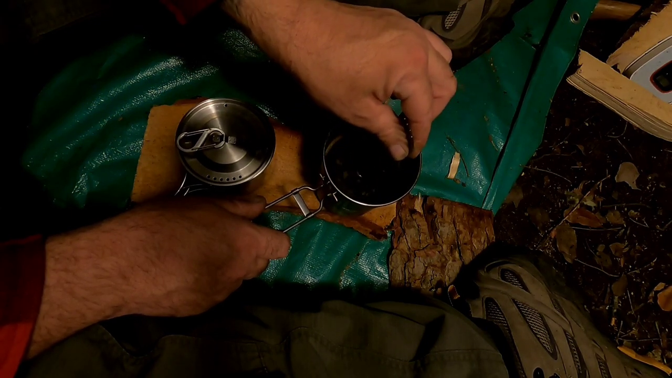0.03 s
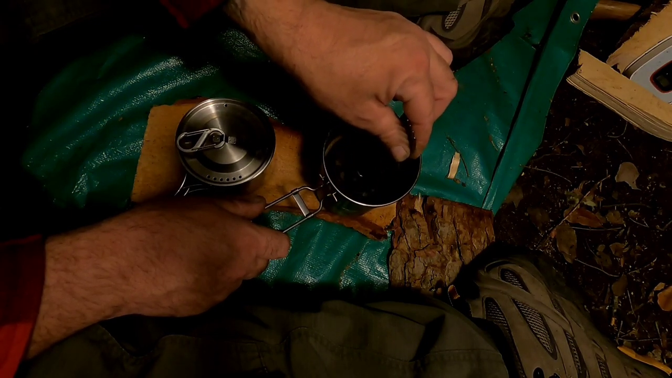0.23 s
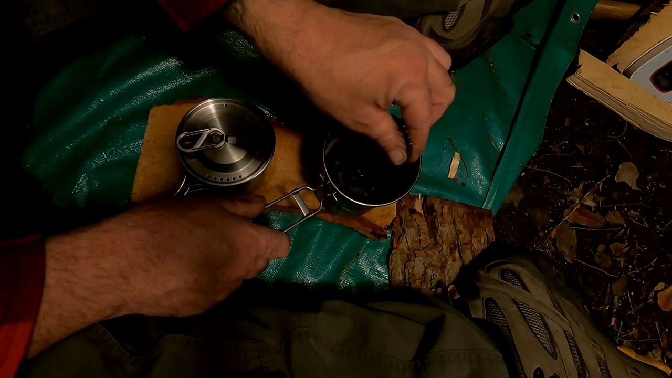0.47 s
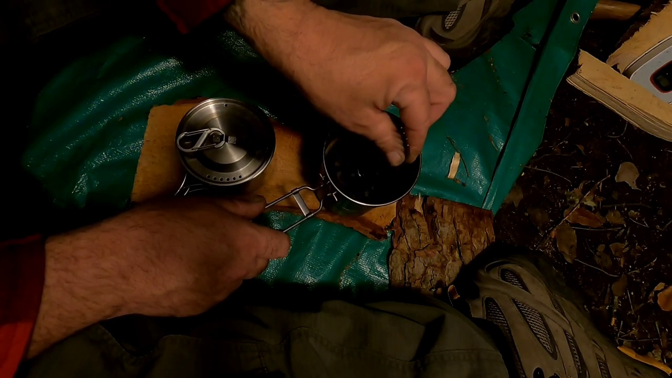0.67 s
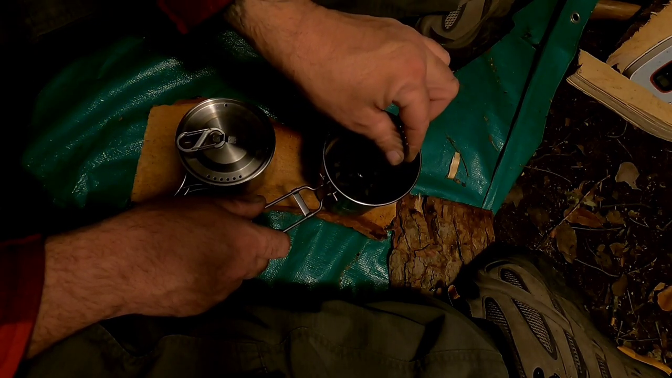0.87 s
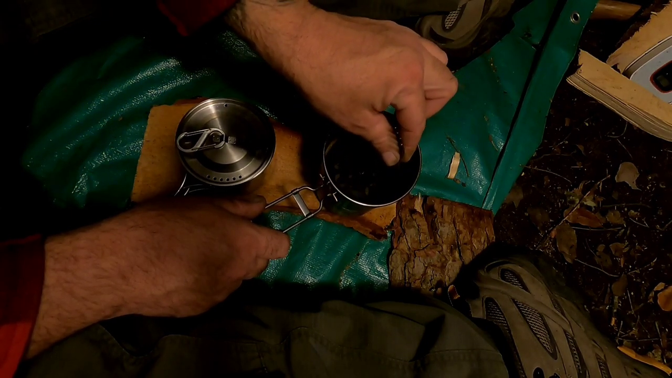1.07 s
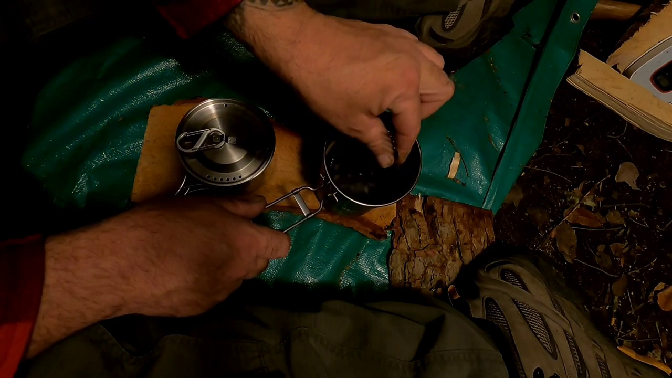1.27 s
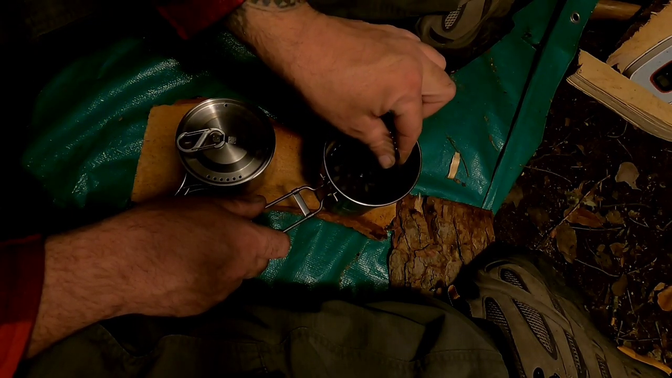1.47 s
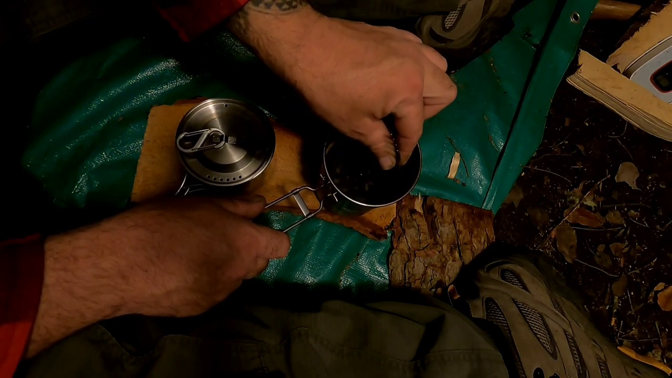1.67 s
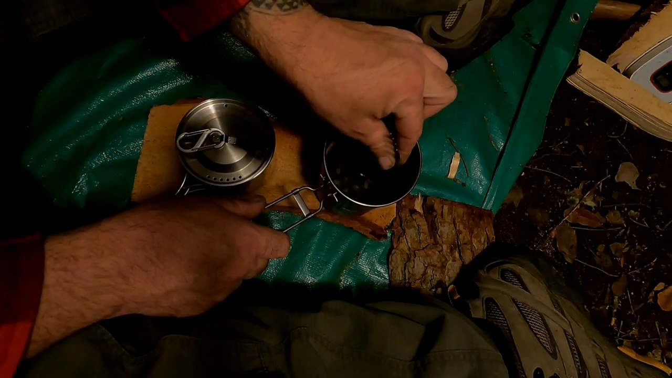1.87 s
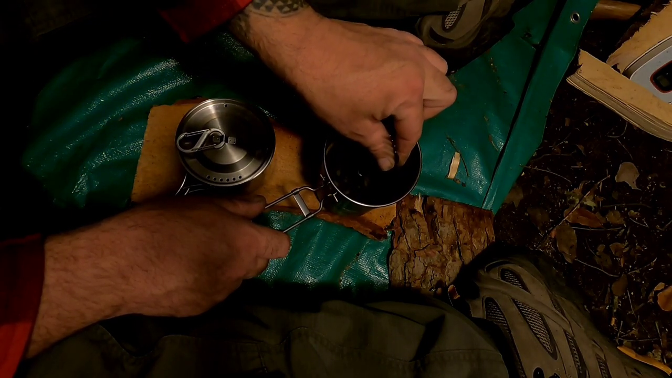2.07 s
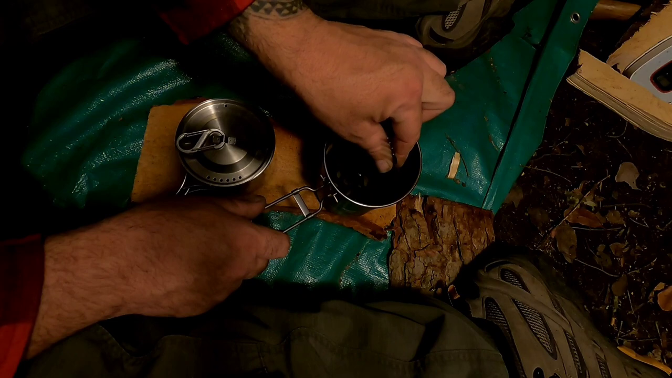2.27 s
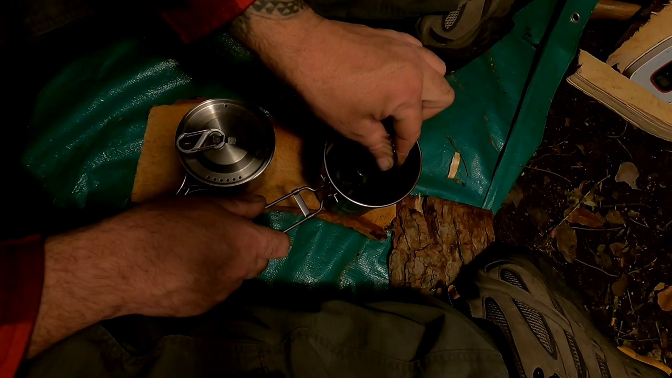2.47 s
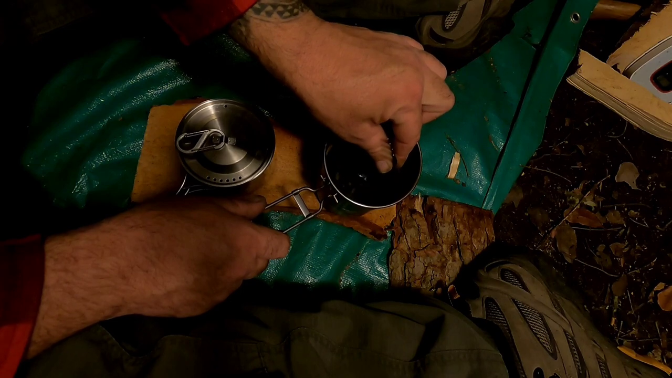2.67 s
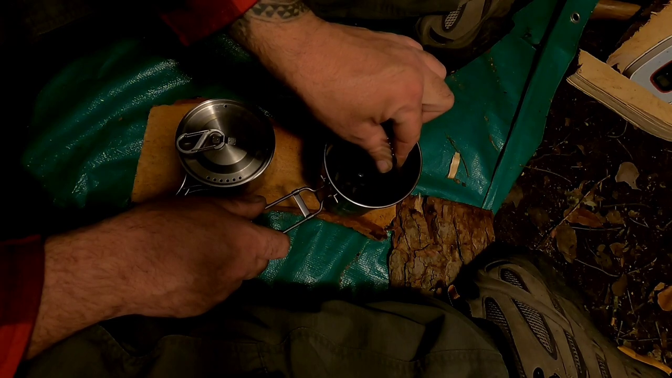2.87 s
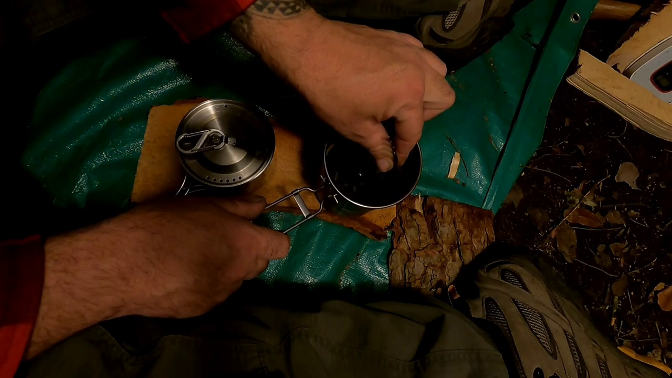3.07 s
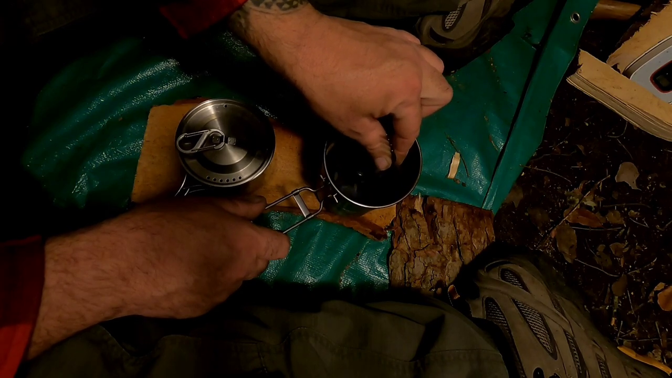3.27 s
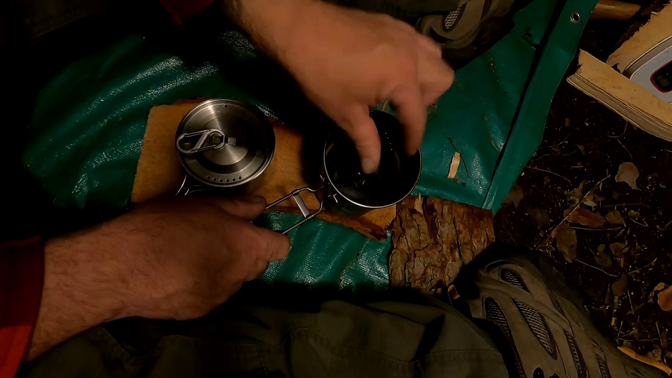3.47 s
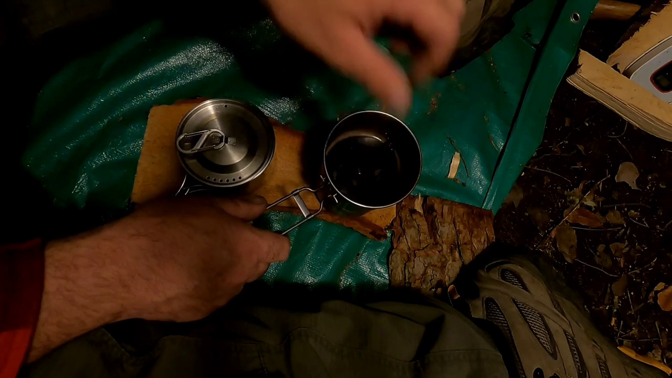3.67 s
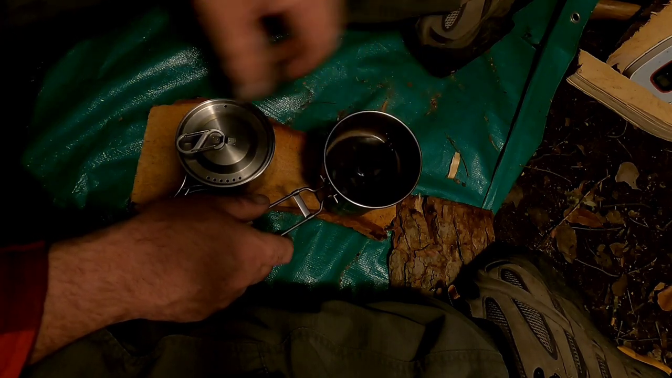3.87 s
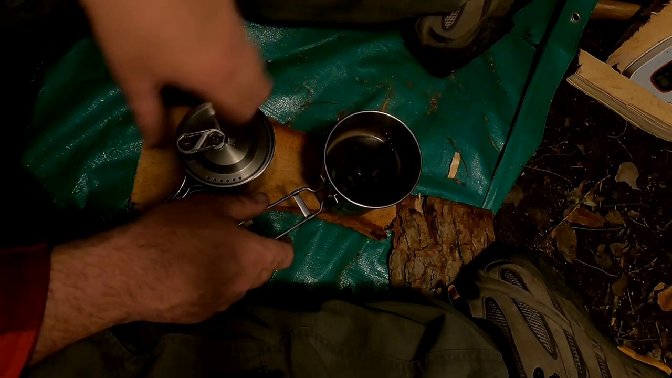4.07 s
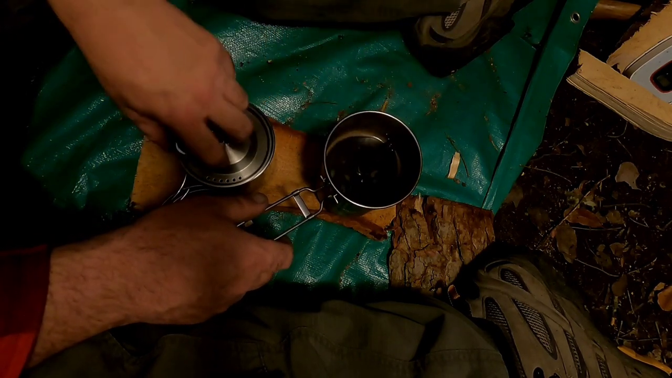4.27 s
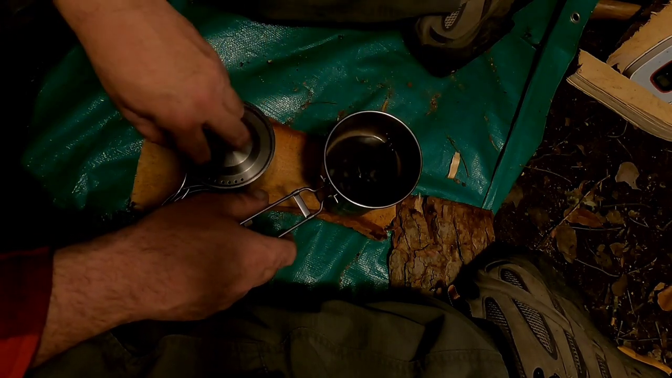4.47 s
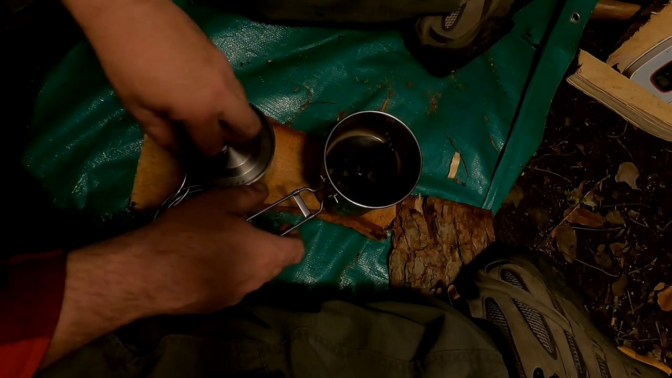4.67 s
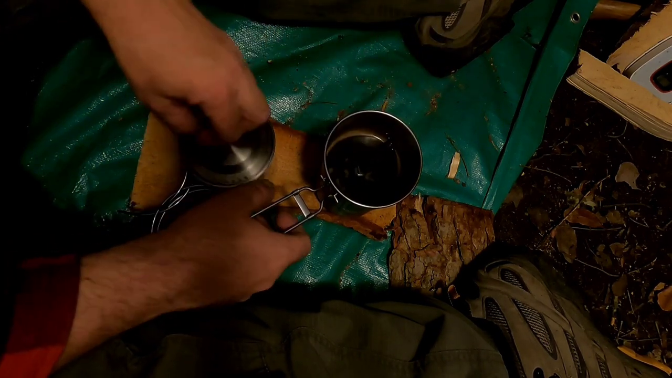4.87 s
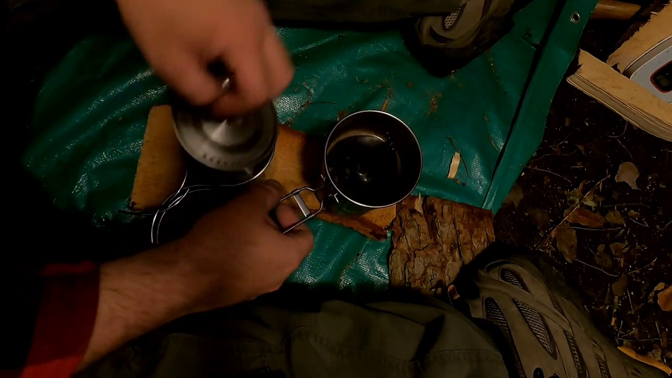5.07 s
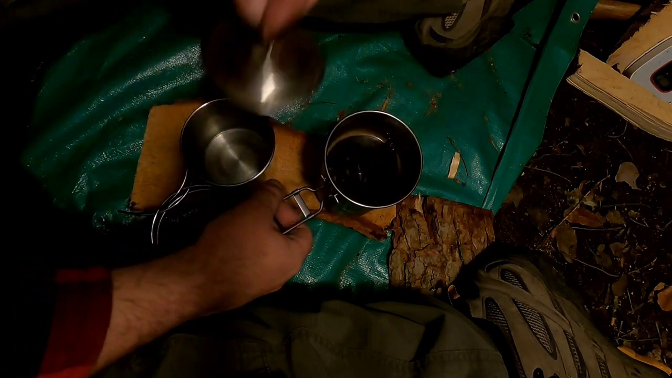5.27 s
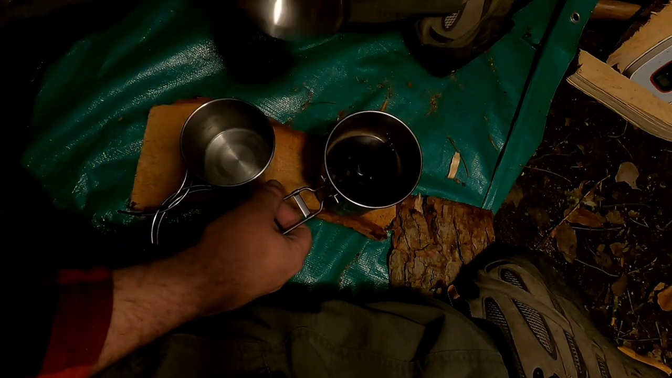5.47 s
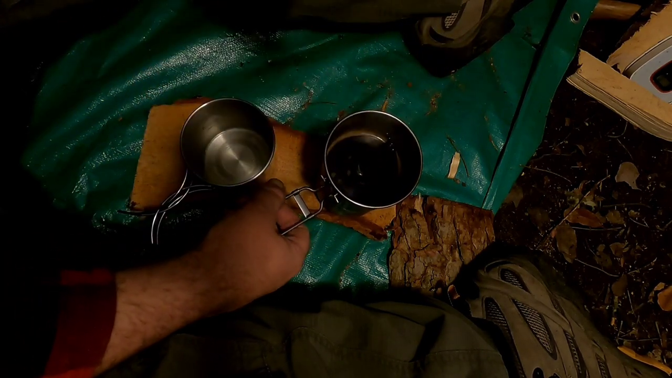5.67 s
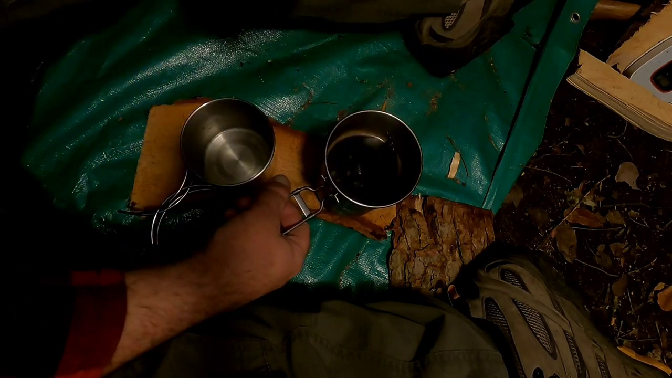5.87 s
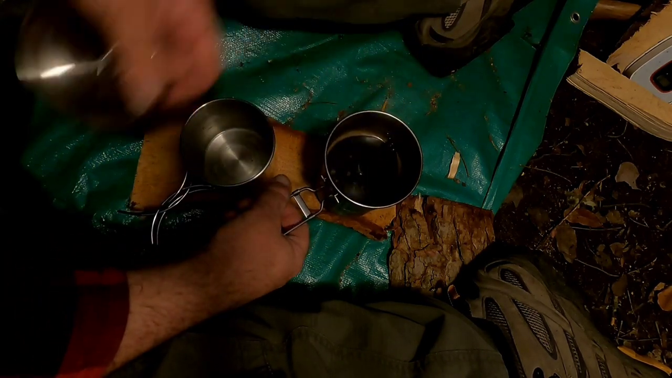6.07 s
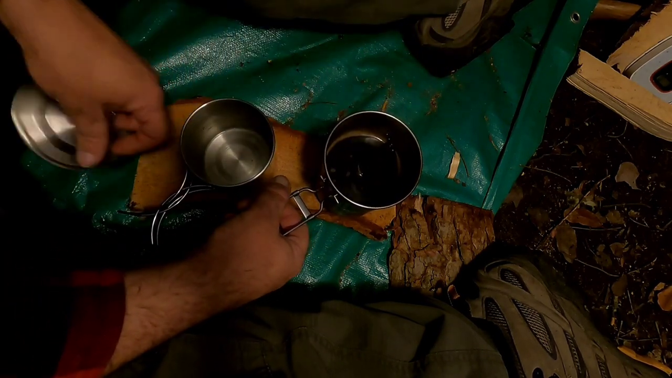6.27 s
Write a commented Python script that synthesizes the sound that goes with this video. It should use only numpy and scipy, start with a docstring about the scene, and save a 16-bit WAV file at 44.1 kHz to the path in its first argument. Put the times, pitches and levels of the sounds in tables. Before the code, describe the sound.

Close up in a tent, fingers squeak and crackle quietly before a thin steel lid grinds loose from its cup and its wire handle jingles away.

```python
"""Small squeaks and crackles of fingers squeezing something over a mug, in a tent with a low rumble; a sleeve swishes.
Then a steel lid is gripped and dragged off its cup, clashing and scraping; its wire handle rattles as it is carried away.
Steel is struck banks of damped modes with a wash of noise; squeaks are bent tones; knocks are decaying sines.
Air, rumble, cloth and crackles are coloured noise, and short noise echoes give the tent."""
import sys
import numpy as np
from scipy import signal
from scipy.fft import rfft, irfft, next_fast_len
from scipy.io import wavfile

SR = 44100
rng = np.random.default_rng(int(sys.argv[2]) if len(sys.argv) > 2 else 0)


def materialize(psi):
    """Save the field psi as 16-bit PCM at rate SR to the path in sys.argv[1].

    A 1-D psi becomes a single channel; in a 2-D psi each row is a channel.
    """
    bounded = np.clip(np.atleast_2d(psi).T, -1, 1)
    quanta = np.round(bounded * 32767).astype(np.int16)
    wavfile.write(sys.argv[1], SR, quanta)


N = 279153
TIME = np.arange(N) / SR  # seconds into the scene
AGE = np.arange(SR // 2) / SR  # seconds since a contact

# fingertip strokes, each a run of squeaky slips:
# start_s, length_s, level_db, pitch_hz (near the top of the bend), slips (count, rounded; also sets the pace)
SKIN_STROKES = [(0.086, 0.07, -57, 1008, 2.7), (.165, .026, -52.5, 986, 1), (.329, 0.14, -52.5, 992, 3.9),
                (0.585, 0.093, -54.5, 987, 3.7), (0.836, 0.043, -58, 1065, 2),
                (0.874, 0.022, -50, 1303, 1.1), (.901, .118, -53, 999, 2.1), (1, 0.083, -50.5, 1302, 2),
                (1.081, 0.1, -51.5, 973, 3.4), (1.199, 0.025, -57.5, 858, 1),
                (1.643, 0.024, -53, 1370, 1.1), (1.816, 0.016, -59.5, 1373, 0.98)]
# ringing modes of the cup with the lid in it: pitch_hz, level_db (relative), t60_s
CUP_MODES = [(650, -11, .035), (1589, 1, .07), (1789, -4, .08), (2168, 2, .13), (2237, 0, .14),
             (2293, -7, .14), (2440, -7, .16), (2750, -10, .06), (3390, -12, .13), (3590, -12, .12),
             (4161, -12, .26), (4436, -6, .18), (4527, -9, .22), (4873, -10, .35), (4990, -7, .12),
             (5425, -6, .12), (5557, -5, .15), (5745, -5, .2), (6190, -8, .13), (6660, -10, .22),
             (6893, -1, .13), (7007, -5, .15), (7460, -8, .12), (7820, -7, .12), (8650, -14, .15),
             (9030, -13, .13), (9950, -16, .13), (11022, -15, .14), (12000, -18, .1)]
# colour of the cup's crowd of weak, quickly damped modes: frequency_hz, density_db (per Hz)
CUP_WASH = [(120, -30), (260, -8), (420, -2.5), (650, -5.5), (950, 0), (1280, -11), (1550, 5.5),
            (2400, -5.5), (3200, -2.5), (5200, 0), (7700, -1), (9000, -11), (12500, -13.5), (15000, -39.5)]


def from_db(db):
    """Amplitude factor of a level in dB."""
    return 10 ** (np.asarray(db) / 20)


def rms_one(x):
    """Scale to rms 1."""
    return x / np.sqrt(np.mean(x ** 2))


def attack_one(x):
    """Scale to rms 1 over the first hundredth of a second."""
    return x / np.sqrt(np.mean(x[:SR // 100] ** 2))


def curve(rows):
    """Straight lines through (s, value) points over the whole scene."""
    return np.interp(TIME, *np.transpose(rows))


def decay(t60):
    """Exponential fade that falls 60 dB in t60 seconds."""
    return np.exp(-np.log(1000) * AGE / t60)


def onset(swell_s):
    """Smooth rise from silence with the given time constant."""
    return 1 - np.exp(-AGE / swell_s)


def add(track, s, sound):
    """Mix a sound into a track from time s on."""
    start = round(s * SR)
    track[start:start + len(sound)] += sound[:N - start]


def noise(spectrum, size):
    """Noise of the given colour, rms 1."""
    hz, db = np.transpose(spectrum)
    padded = next_fast_len(size)
    bins = np.maximum(np.fft.rfftfreq(padded, 1 / SR), 1)
    gain = from_db(np.interp(np.log(bins), np.log(hz), db))
    return rms_one(irfft(rfft(rng.standard_normal(padded)) * gain, padded)[:size])


def wide_noise(spectrum, side_db):
    """Stereo noise, mostly common to both sides, and almost wholly so in the deep bass."""
    high_pass = signal.butter(2, 120, "high", fs=SR, output="sos")
    side = signal.sosfilt(high_pass, noise(spectrum, N))
    return noise(spectrum, N) + from_db(side_db) * side * np.array([[1], [-1]])


def drift(per_s):
    """Slow random wandering, with knots of spread 1 joined by straight lines."""
    knots = rng.standard_normal(N // 20)
    return np.interp(TIME * per_s, np.arange(len(knots)), knots)


def thumps(rows, swell_s):
    """Each push sets one mode swinging: (s, dB, Hz, t60 s)."""
    out = np.zeros(N)
    for s, db, hz, t60 in rows:
        shape = decay(t60) * onset(swell_s) ** 2
        shape /= shape.max()
        add(out, s, from_db(db) * shape * np.sin(2 * np.pi * hz * AGE))
    return out


def voiced_by_contact(sound, clang_db, treble_db):
    """A hard contact favours the treble, a soft one the low modes."""
    split_hz = 2800
    low_pass = signal.butter(4, split_hz, "low", fs=SR, output="sos")
    high_pass = signal.butter(4, split_hz, "high", fs=SR, output="sos")
    clang = attack_one(signal.sosfilt(low_pass, sound))
    treble = attack_one(signal.sosfilt(high_pass, sound))
    return from_db(clang_db) * clang + from_db(treble_db) * treble


def tent(x, near_db, tail_db, tail_t60):
    """Board, hands and fabric throw back early echoes, different at each ear, then a faint tail."""
    colour = [(100, -7.0), (500, -4.0), (6000, -3.0), (15000, -2.0)]  # (Hz, dB per Hz)
    sides = []
    for _ in range(2):
        near = noise(colour, len(AGE)) * decay(0.029) * (AGE > .0004)
        tail = noise(colour, len(AGE)) * decay(tail_t60) * (AGE > .008)
        near /= np.linalg.norm(near)
        tail /= np.linalg.norm(tail)
        echoes = from_db(near_db) * near + from_db(tail_db) * tail
        sides.append(x + signal.fftconvolve(x, echoes)[:N])
    return np.array(sides)


def still_air():
    """Steady coloured noise of the air."""
    # colour of the air: frequency_hz, density_db (per Hz)
    air_colour = [(15, -39), (25, -20), (59, -1.5), (103, -15.5), (181, 0), (237, -3.5), (354, -12),
                  (673, -20.5), (856, -23.5), (1030, -15.5), (1460, -12.5), (3930, -41), (7280, -44),
                  (12100, -39), (15000, -48)]
    return from_db(-64.5) * wide_noise(air_colour, side_db=-4)


def low_rumble():
    """Low noise whose level wanders unevenly around a slow curve."""
    # colour of the rumble: frequency_hz, density_db (per Hz)
    rumble_colour = [(20, -12.5), (55, 5), (105, -7.5), (170, 4), (250, -2.5), (400, -17.5), (700, -57)]
    # central level of the rumble: time_s, level_db
    rumble_level = [(0, -63.5), (.95, -64), (1.7, -59.5), (4.3, -61.5), (4.5, -62.5), (6.33, -77)]
    level_db = curve(rumble_level) + 2.3 * drift(8.3)
    return from_db(level_db) * wide_noise(rumble_colour, side_db=-13.5)


def sliding_strength():
    """Strength of the friction hiss: the sleeve, plus skin for the length of each stroke."""
    # sleeve sliding as the arm swings across and carries the lid off: time_s, level_db
    sleeve_level = [(3.5, -71.5), (3.62, -65.5), (3.75, -53.5), (3.9, -61), (4.1, -66.5), (5.15, -56.5),
                    (5.45, -66), (5.95, -58.5), (6.33, -62.5)]
    skin_hiss_db, skin_fade_s = -20.5, 0.0055  # hiss is relative to the squeaks
    gain = from_db(curve(sleeve_level))
    for start, length, db, _, _ in SKIN_STROKES:
        outside_s = np.maximum(np.abs(TIME - start - length / 2) - length / 2, 0)
        fade = np.maximum(1 - outside_s / skin_fade_s, 0)
        gain = gain + from_db(db + skin_hiss_db) * fade
    return gain


def sliding_cloth_and_skin():
    """Friction makes a fluttering hiss as strong as the sliding."""
    # colour of the rustle: frequency_hz, density_db (per Hz)
    rustle_colour = [(240, -34), (400, 0.5), (576, -11.5), (816, -10), (1290, 2), (2830, 0), (3450, -5.5),
                     (6320, -1.5), (12300, -20), (15000, -32)]
    flutter = from_db(1.22 * drift(90))
    return sliding_strength() * flutter * wide_noise(rustle_colour, side_db=-8.5)


def slips_of_skin():
    """A fingertip sticks and slips at a nearly even pace through each stroke: (s, dB, Hz)."""
    scatter_db, pitch_spread = 1.5, 0.0433  # from one slip to the next
    for start, length, db, hz, slips in SKIN_STROKES:
        pace_s = length / max(slips, 1)
        for k in range(round(slips)):
            late, force, bend = rng.standard_normal(3)
            slip_s = start + pace_s * (k + 0.0706 * late)
            yield slip_s, db + scatter_db * force, hz * (1 + pitch_spread * bend)


def squeaks(length_s, arch, second_db, rub_db):
    """Each slip of a fingertip is a brief rough tone that rises and falls in pitch."""
    # colour of the rub: (Hz, dB per Hz)
    rub_colour = [(400, -11.5), (900, 2.5), (1400, -3.0), (2000, -4), (2700, -8.5), (3500, -40), (12000, -41)]
    out = np.zeros(N)
    for s, db, hz in slips_of_skin():
        stretch, skew = np.exp(0.203 * rng.standard_normal(2))  # slips vary in length and bend
        progress = np.minimum(AGE / (length_s * stretch), 1)
        hump = np.sin(np.pi * progress ** skew)
        phase = 2 * np.pi * np.cumsum(hz * (1 + arch * (hump - .88))) / SR
        tone = np.sin(phase) + from_db(second_db) * np.sin(2 * phase)
        rub = noise(rub_colour, len(AGE)) * decay(0.17) * onset(0.0034)
        add(out, s, from_db(db) * (tone * np.abs(hump) ** 1.6 + from_db(rub_db) * rub))
    return out


def crackles(grain_db):
    """Crackles and ticks of handling are short bursts of noise with uneven grains."""
    # bursts: start_s, low_db (below 2.8 kHz), treble_db, t60_s
    bursts = [(.275, -53, -66.5, 0.33), (.497, -57.5, -57, 0.19), (1.293, -77, -66.5, 0.19),
              (1.561, -79, -67.5, .2), (1.653, -65, -61, 0.054), (1.907, -98, -64, 0.054),
              (2.055, -77, -65, .076), (2.148, -79, -64, 0.19), (2.228, -58.5, -72, 0.19),
              (2.379, -59, -55, 0.34), (2.549, -69.5, -64, 0.11), (2.778, -90, -65, 0.016),
              (3.271, -56.5, -66, 0.34), (3.364, -56, -51.5, .17), (5.695, -47, -55, 0.021),
              (6.019, -75, -56, 0.061)]
    # colour of the bursts: frequency_hz, density_db (per Hz)
    crackle_colour = [(200, -5), (600, -9.5), (1400, 3.5), (2300, -2), (4000, -3), (7000, 1.5), (10000, -7),
                      (12500, -20), (15000, -20)]
    out = np.zeros(N)
    knots = AGE[::64]
    for s, low_db, treble_db, t60 in bursts:
        grains = np.interp(AGE, knots, from_db(grain_db * rng.standard_normal(len(knots))))
        burst = noise(crackle_colour, len(AGE)) * grains * decay(t60)
        add(out, s, voiced_by_contact(burst, low_db, treble_db))
    return out


def fingers():
    """Squeaks and crackles of the squeezing hand."""
    return squeaks(length_s=.027, arch=.42, second_db=-17, rub_db=-5) + crackles(grain_db=1.5)


def groundsheet_bumps():
    """Soft bumps on the groundsheet, each one low damped tone."""
    # bumps: start_s, level_db, pitch_hz, t60_s
    bump_rows = [(.585, -49.5, 72.5, 0.078), (.945, -54, 61, .075), (1.198, -47.5, 61, 0.12),
                 (1.6, -52, 50.9, 0.22), (4.085, -44.5, 161, 0.083), (5.27, -48.5, 66, 0.12)]
    return thumps(bump_rows, swell_s=0.0072)


def steel_ring(modes, wash, wash_db, wash_t60, length, scatter_db, detune, swell_s):
    """One blow on thin steel: the spot sets mode strengths, the grip damps modes and shifts their pitch."""
    hz, db, t60 = np.transpose(modes)
    strength, shift = rng.standard_normal((2, len(hz)))
    gain = from_db(db + scatter_db * strength) * rng.choice([-1, 1], len(hz))
    age = AGE.astype(np.float32)
    # a quickly damped mode is broader, so it may shift further
    turn = (2 * np.pi * (hz + detune * shift / t60)).astype(np.float32)
    damping = (np.log(1000) / (t60 * length)).astype(np.float32)
    fading = np.exp(-np.minimum(damping[:, None] * age, 20))
    clear = gain @ (np.sin(turn[:, None] * age) * fading)
    crowd = noise(wash, len(AGE)) * decay(wash_t60 * length)
    ring = attack_one(clear) + from_db(wash_db) * attack_one(crowd)
    return ring * onset(swell_s)  # the wall needs a moment to take up the motion


def at_spot(ring, s):
    """The place of contact lifts the modes near one pitch."""
    # pitch favoured as the contact wanders round the rim: time_s, pitch_hz
    spot_pitch = [(4.18, 6760), (4.2, 4540), (4.39, 7000), (4.465, 4600), (4.55, 4950), (4.64, 5500),
                  (4.68, 5150), (4.83, 5600), (4.865, 7250), (4.917, 3593), (5.16, 6600), (5.33, 7000),
                  (5.49, 3450), (5.58, 3630), (5.63, 4070), (5.96, 4530), (6.15, 3480), (6.23, 7200)]
    width_hz, lift_db = 280, 6.5
    hz = np.interp(s, *np.transpose(spot_pitch))
    b, a = signal.iirpeak(hz, hz / width_hz, fs=SR)
    return ring + (from_db(lift_db) - 1) * signal.lfilter(b, a, ring)


def bouncing(rows):
    """Each blow and its quick, dying bounces: (s, clang dB, treble dB, ring length factor, panel Hz)."""
    # a bounce loses more clang than treble and lands on a stiffer spot of the panel
    gap_s, clang_loss_db, treble_loss_db, pitch_ratio = 0.0069, 8.5, 2, 1.19
    for s, clang_db, treble_db, length, hz, bounces in rows:
        yield s, clang_db, treble_db, length, hz
        for k in range(1, round(bounces) + 1):
            late, bend = rng.standard_normal(2)
            bounce_s = s + gap_s * (k + .12 * late)
            bounce_hz = hz * pitch_ratio * (1 + 0.058 * bend)
            yield bounce_s, clang_db - clang_loss_db * k, treble_db - treble_loss_db * k, length, bounce_hz


def scraping(slips_per_s, spread_db, panel_db, panel_t60):
    """Dense uneven slips of the rim keep the cup ringing; each stroke rubs another spot."""
    # rim dragging in the cup: peak_s (hardest moment), level_db, rise_s, fall_s, panel_hz
    strokes = [(4.174, -34.5, 0.00557, 0.0074, 1550), (4.216, -32.5, 0.013, 0.029, 2220),
               (4.403, -23.5, 0.024, 0.013, 1740), (4.465, -36.5, 0.022, 0.039, 2180),
               (4.572, -35, 0.0096, 0.027, 2230), (4.643, -32, 0.022, 0.036, 2294),
               (4.819, -35, 0.01, 0.02, 2193), (4.893, -44, 0.013, 0.024, 2130)]
    out = np.zeros(N)
    since = AGE - AGE[-1] / 2  # seconds from the hardest moment
    for s, db, rise, fall, panel_hz in strokes:
        pressure = np.exp(np.minimum(since / rise, -since / fall))
        slips = (rng.random(len(AGE)) < slips_per_s / SR) * rng.choice([-1, 1], len(AGE))
        slips = slips * from_db(spread_db * rng.standard_normal(len(AGE)))
        modes = CUP_MODES + [(panel_hz, panel_db, panel_t60)]
        ring = steel_ring(modes, CUP_WASH, wash_db=0.5, wash_t60=0.11, length=0.77,
                          scatter_db=4.0, detune=3.3, swell_s=0.00032)
        sound = signal.fftconvolve(slips * pressure, at_spot(ring, s))
        # match the energy of the pressure curve
        sound *= np.sqrt(np.sum(pressure ** 2) / (np.sum(sound ** 2) + 1e-20))
        add(out, s + since[0], from_db(db) * sound)
    return out


def clashes(panel_db, panel_t60):
    """The lid hits the cup it sits in; its panel mostly rings higher as it works loose."""
    # blows: start_s, clang_db (below 2.8 kHz), treble_db, ring_length (factor), panel_hz, bounces (count)
    blows = [(4.1764, -26.5, -22, 0.68, 1550, 1), (4.2018, -25.5, -25.5, 0.7, 1549, 1),
             (4.2712, -40, -55, 1, 1575, 0), (4.345, -40, -62, 1, 1620, 0),
             (4.3696, -36, -42, 0.81, 1700, 0), (4.3904, -32, -26, 0.77, 1524, 0),
             (4.3975, -50, -23.5, 0.78, 1790, 1), (4.5032, -44, -39.5, 0.97, 2130, 0),
             (4.5216, -35, -37, 0.52, 2170, 0), (4.5381, -30, -28, 0.8, 2370, 0),
             (4.5541, -30, -31.5, 0.84, 2193, 0), (4.6349, -41.5, -35.5, 0.76, 2250, 0),
             (4.6613, -36, -33.5, 0.39, 2420, 0), (4.6768, -34, -28.5, 0.66, 2480, 0),
             (4.7601, -45, -56.5, 0.64, 1445, 0), (4.8314, -38, -38.5, 0.86, 2263, 0),
             (4.8643, -44, -35.5, 1, 2190, 0)]
    out = np.zeros(N)
    for s, clang_db, treble_db, length, panel_hz in bouncing(blows):
        modes = CUP_MODES + [(panel_hz, panel_db, panel_t60)]
        ring = steel_ring(modes, CUP_WASH, wash_db=-2.5, wash_t60=0.135, length=length,
                          scatter_db=2.5, detune=2.16, swell_s=0.00052)
        add(out, s, voiced_by_contact(at_spot(ring, s), clang_db, treble_db))
    return out


def cup_knocks():
    """Hollow knocks of the cup, each answered by a low tone of the board under it."""
    # knocks: start_s, level_db, pitch_hz, t60_s
    knock_rows = [(4.18, -33.5, 326, 0.055), (4.201, -33.5, 445, 0.081), (4.322, -28, 394, 0.019),
                  (4.393, -23, 389, 0.037), (4.419, -32, 360, 0.014), (4.203, -38.5, 674, 0.14),
                  (4.659, -41.5, 420, 0.061), (4.812, -43, 405, 0.077), (4.816, -43.5, 856, 0.11)]
    board_hz, board_db, board_t60 = 197, -15.5, 0.0368  # level relative to the knock
    answers = [(s, db + board_db, board_hz, board_t60) for s, db, _, _ in knock_rows]
    return thumps(knock_rows + answers, swell_s=0.003)


def cavity():
    """The hollow tone of the air in the cup glides, mostly upward, as the gap under the lid opens."""
    # pitch of the air in the cup: time_s, pitch_hz
    air_pitch = [(4.45, 405), (4.54, 508.5), (4.58, 510), (4.62, 492), (4.69, 518), (4.87, 485),
                 (4.925, 749), (5.1, 758), (5.17, 860), (5.22, 815)]
    # jolts that set that air ringing: start_s, level_db, t60_s
    jolt_rows = [(4.465, -43, 0.33), (4.554, -44.5, 0.45), (4.66, -52.5, 0.23), (4.86, -41, 0.095),
                 (4.917, -55, .75), (5.175, -52, .15)]
    level = np.zeros(N)
    for s, db, t60 in jolt_rows:
        add(level, s, from_db(db) * decay(t60) * onset(0.0024))
    return level * np.sin(2 * np.pi * np.cumsum(curve(air_pitch)) / SR)


def singing_rim():
    """Two lightly damped tones carry on from one tap to the next, wavering as the grip shifts."""
    # taps that leave the lid's rim singing: start_s, low_tone_db, high_tone_db (both before the waver)
    taps = [(4.8314, -38, -48), (4.9171, -58, -49), (5.1602, -38, -46), (5.3288, -40, -51),
            (5.4929, -42, -45), (5.6316, -47, -52)]
    low_hz, high_hz, t60, waver_db = 2230, 3340, .33, 5.5
    low = [(s, db, low_hz, t60) for s, db, _ in taps]
    high = [(s, db, high_hz, t60) for s, _, db in taps]
    waver = from_db(waver_db * drift(45) - waver_db / 2)
    return thumps(low + high, swell_s=0.00085) * waver


def at_random(start_s, end_s, per_s):
    """Uneven moments through a span of time, at a given mean rate."""
    count = round((end_s - start_s) * per_s)
    return start_s + (np.arange(count) + rng.random(count)) / per_s


def rattles(panel_db, panel_t60):
    """The handle taps the lid and jingles in between; the flat panel rings loud, its pitch bent by the grip."""
    # wire handle tapping the loose lid:
    # start_s, clang_db (below 2.8 kHz), treble_db, ring_length (factor), panel_hz, bounces (count, rounded)
    handle_taps = [(4.9171, -29.5, -38.5, 1, 2062, 0), (4.9539, -39, -62, 0.72, 2050, 0),
                   (5.0462, -40.5, -64, .45, 1930, 0), (5.0993, -43.5, -59.5, 0.68, 1940, 2),
                   (5.1448, -39, -72, 1, 2045, 0), (5.1539, -37.5, -47, 1.3, 1970, 0),
                   (5.1602, -28, -31, 0.6, 1843, 2), (5.27, -41.5, -46, 0.69, 2260, 0),
                   (5.2907, -30, -37, 0.47, 1810, 0), (5.3015, -34, -33.5, .5, 1890, 0),
                   (5.3288, -41.5, -41.5, 0.6, 1990, 0), (5.377, -49, -57, 1, 2270, 0),
                   (5.4929, -34.5, -33, 0.61, 1952, 1), (5.5758, -38.5, -35, 0.72, 2126, 0),
                   (5.6215, -37.5, -39, 0.63, 2030, 0), (5.6316, -33.5, -37.5, 0.65, 2056, 0),
                   (5.641, -43, -46, .6, 2180, 0), (5.653, -40, -50.5, 0.48, 2130, 0),
                   (5.7296, -49.5, -60, 0.74, 2060, 0), (5.796, -39.5, -52, 0.52, 2035, 0),
                   (5.9, -52.5, -58, 2.2, 2160, 0), (5.9438, -36, -41.5, 0.6, 1855, 1),
                   (5.9597, -27.5, -40.5, 0.47, 1863, 1), (6.1436, -44.5, -53.5, 0.77, 1990, 1),
                   (6.1644, -42, -56.5, 0.87, 2035, 0), (6.187, -48, -62, 1.3, 2090, 0),
                   (6.2184, -46, -61, 0.58, 2130, 0), (6.2297, -37.5, -41, 0.61, 1824, 1.46),
                   (6.2584, -49, -46, 0.303, 1960, 0.42)]
    # ringing modes of the loose lid: pitch_hz, level_db (relative), t60_s
    lid_modes = [(1790, -5, .035), (2035, -6, .07), (2245, -6, .1), (2440, -6, .05), (3180, -14, .07),
                 (3560, -11, .09), (4140, -13, .06), (4510, -6, .06), (4940, -12, .1), (5200, -9, .06),
                 (6240, -15, .11), (6360, -12, .06), (6662, -8, .1), (7070, -10, .16), (7400, -17, .08),
                 (8200, -22, .1), (9900, -22, .13), (11000, -26, .08), (12000, -22, .06)]
    # colour of the lid's crowd of weak, quickly damped modes: frequency_hz, density_db (per Hz)
    lid_wash = [(200, -20), (550, -19), (850, -9), (1250, -26), (1800, 4), (2400, -9), (2800, -16.5),
                (3600, -6.5), (4900, -7.5), (5750, -11.5), (6800, -5.5), (8800, -18.5), (12000, -15.5),
                (15000, -48)]
    # faint jingling while the lid is carried: clang dB, treble dB, ring length factor, panel Hz
    jingle = (-50, -70, 0.68, 2070)
    jingles = [(s, *jingle) for s in at_random(5.0, 6.3, per_s=4)]
    out = np.zeros(N)
    for s, clang_db, treble_db, length, panel_hz in list(bouncing(handle_taps)) + jingles:
        modes = lid_modes + [(panel_hz, panel_db, panel_t60)]
        ring = steel_ring(modes, lid_wash, wash_db=-9, wash_t60=0.12, length=length,
                          scatter_db=5.0, detune=2.93, swell_s=0.00072)
        add(out, s, voiced_by_contact(at_spot(ring, s), clang_db, treble_db))
    return out


def scene():
    """Steel moves across the stereo field; everything else leans slightly right."""
    # where the lid is: time_s, balance_db (left minus right)
    lid_balance = [(4.2, -.3), (4.8, -.8), (5.2, -1.7), (5.6, -.5), (6.0, .8), (6.3, 1.8)]
    left_right = np.array([[.5], [-.5]])
    background = still_air() + low_rumble() + sliding_cloth_and_skin()
    hand = tent(fingers(), near_db=-7.5, tail_db=-10, tail_t60=0.19)
    hollow = groundsheet_bumps() + cup_knocks() + cavity()
    board = tent(hollow, near_db=-14, tail_db=-14.5, tail_t60=0.21)
    steel = scraping(slips_per_s=540, spread_db=6.0, panel_db=9, panel_t60=0.093)
    steel += clashes(panel_db=4, panel_t60=0.1)
    steel += singing_rim()
    steel += rattles(panel_db=11.0, panel_t60=0.07)
    lid = tent(steel, near_db=-7.0, tail_db=-20.5, tail_t60=0.23) * from_db(curve(lid_balance) * left_right)
    return lid + (background + hand + board) * from_db(-1.7 * left_right)


def record(dry):
    """The top is cut steeply above 15 kHz."""
    low_pass = signal.ellip(10, .3, 80, 15000, fs=SR, output="sos")
    return signal.sosfilt(low_pass, dry)


dry = scene()
out = record(dry)
materialize(out)
```